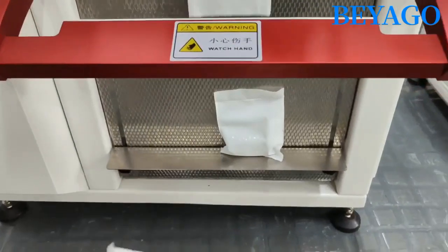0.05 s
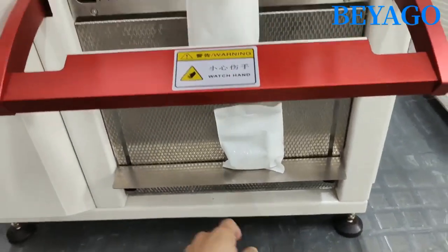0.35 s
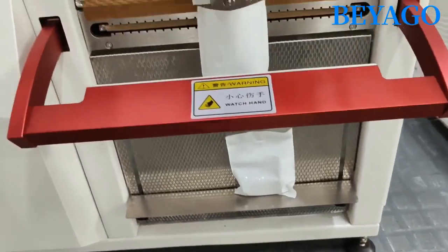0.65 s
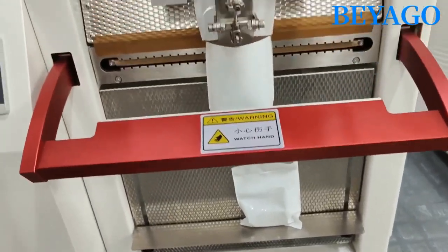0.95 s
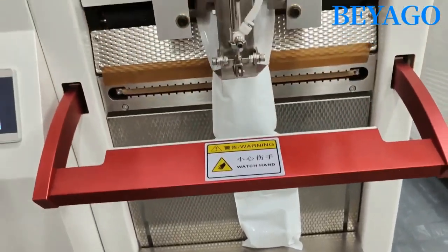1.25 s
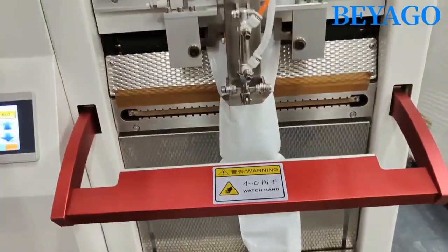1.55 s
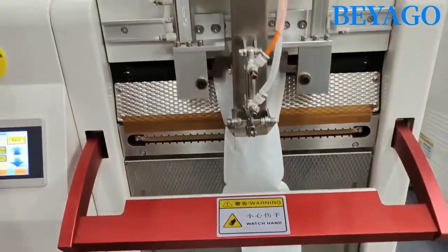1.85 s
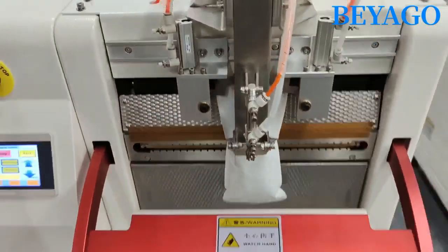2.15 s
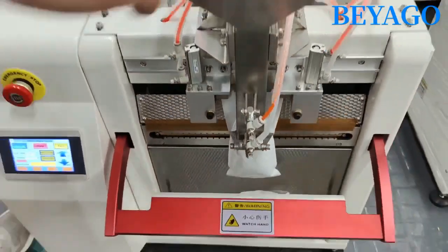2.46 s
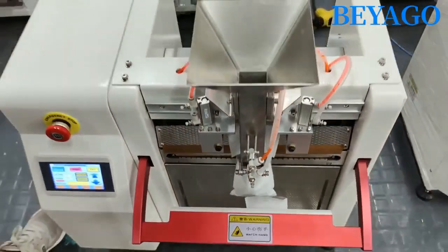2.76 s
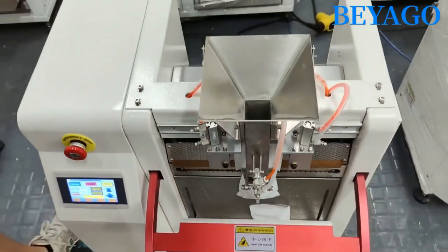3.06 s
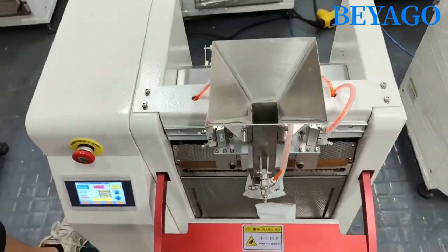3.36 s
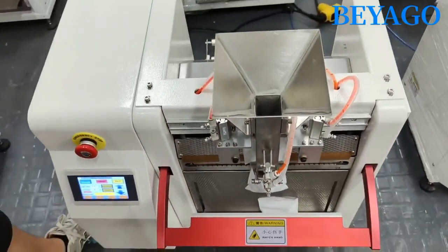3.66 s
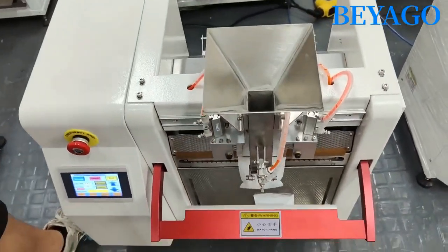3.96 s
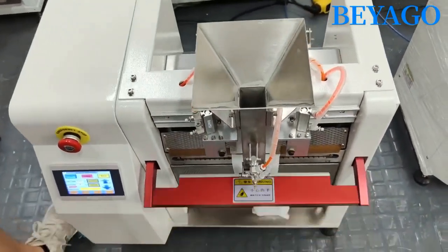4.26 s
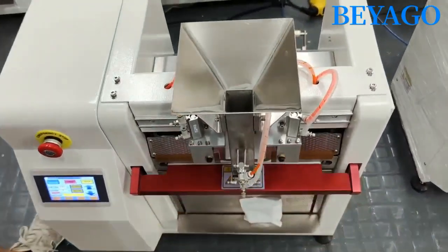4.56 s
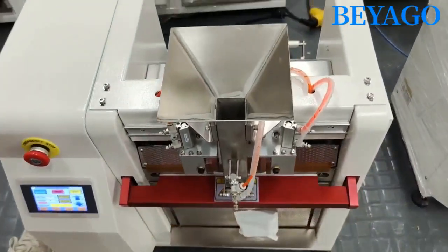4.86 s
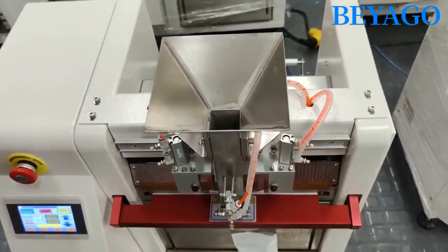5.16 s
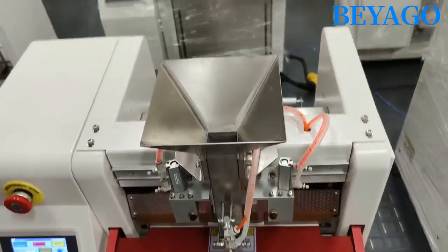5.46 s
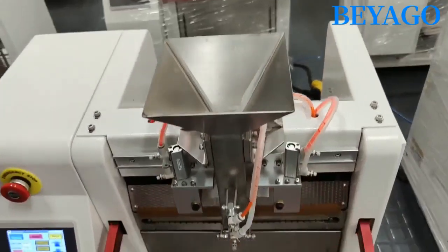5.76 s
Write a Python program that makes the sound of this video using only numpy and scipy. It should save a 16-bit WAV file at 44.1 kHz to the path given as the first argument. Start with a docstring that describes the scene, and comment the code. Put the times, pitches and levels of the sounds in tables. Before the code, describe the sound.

An automatic bagging machine hisses with air, clacks its clamps on steel, then rumbles and knocks as a sealing jaw snaps shut.

```python
"""An automatic bagging machine runs one cycle close by in a hard-walled workshop.
First a vacuum ejector hisses: turbulent jet noise, coloured by air-line resonances, as it holds the bag.
From 1.6 s pneumatic clamps clack on steel, ring in their bending modes and vent their air.
At 3.4 s the valve shuts, a cylinder slams into its stop and the hiss dies. Then the sealing jaw is
driven in with a rumble, knocks in the hollow frame and snaps shut near 5.5 s."""
import sys
import numpy as np
from scipy import signal
from scipy.fft import rfft, irfft, next_fast_len
from scipy.io import wavfile
from scipy.ndimage import map_coordinates

SR = 44100
rng = np.random.default_rng(int(sys.argv[2]) if len(sys.argv) > 2 else 0)


def file_out(sig):
    """Save sig as 16-bit WAV at sys.argv[1]."""
    # one column per channel
    cols = np.atleast_2d(sig).T
    # limit, then scale
    lim = np.clip(cols, -1, 1)
    pcm = np.round(lim * 32767).astype(np.int16)
    wavfile.write(sys.argv[1], SR, pcm)


N = 261072

# Spectra of distant machines, the jet and the jaw drive. Each row: frequency in Hz, level in dB.
WORKSHOP_SPECTRUM = [(25, -112), (80, -103), (150, -102), (400, -100), (1000, -87), (2500, -96),
                     (5000, -100), (9000, -100), (11500, -111), (15500, -107)]
JET_SPECTRUM = [(30, -116), (80, -104), (160, -100), (280, -91), (1000, -98), (1700, -81), (2500, -80.5),
                (4000, -76), (4850, -87), (5500, -80), (9800, -75.5), (11200, -99), (13000, -82.5),
                (15700, -82)]
RUMBLE_SPECTRUM = [(40, -104), (85, -79.5), (125, -70.5), (160, -70), (195, -63.5), (232, -66.5),
                   (272, -60), (325, -69), (430, -65), (620, -67.5), (900, -82.5), (2000, -85), (4900, -78),
                   (5600, -99), (9000, -104)]
# Reverberation of the workshop. Each row: frequency in Hz, t60 (time to fall 60 dB) in seconds.
ROOM_T60 = [(150, 3), (500, 0.93), (1200, 1.01), (3000, 1.25), (5000, 0.89), (9000, 0.69), (15000, 0.48)]
# Air-line resonances at four stages of the grip. Each row: frequency in Hz, width in Hz, level in dB.
CUPS_OPEN = [(334, 112, -66.5), (460, 80, -66.5), (600, 74, -59.5), (757, 120, -69), (1416, 310, -67.5),
             (1790, 440, -71.5), (2506, 260, -70.5), (3350, 95, -65.5), (3610, 290, -68.5),
             (4160, 100, -73), (5290, 70, -67), (5870, 94, -66), (6740, 220, -69.5), (8270, 110, -65),
             (9030, 290, -61.5), (10000, 560, -70.5), (15300, 880, -76)]
CUPS_SEALED = [(390, 120, -80), (699, 90, -67), (1357, 214, -69), (2060, 150, -71.5), (2750, 200, -82),
               (3470, 214, -62.5), (4170, 1040, -75), (5380, 150, -70), (5930, 220, -68), (6570, 110, -68),
               (6930, 190, -70), (8440, 680, -72), (9160, 280, -68), (10000, 130, -69), (16000, 310, -72)]
BAG_CLAMPED = [(984, 200, -69), (1450, 170, -69), (2010, 190, -66), (3400, 600, -68), (5520, 640, -71.5),
               (6940, 720, -71), (8830, 750, -68.5), (16300, 310, -82)]
BAG_SPREAD = [(357, 122, -63.5), (538, 26, -65.5), (684, 116, -65.5), (865, 73, -68.5), (1300, 220, -70),
              (1984, 270, -67), (3380, 310, -72), (5240, 200, -72.5), (6260, 660, -69.5),
              (6800, 320, -66.5), (8520, 360, -69.5), (9250, 370, -68.5), (10170, 160, -68.5),
              (15360, 500, -85.5)]
# Strokes of the drive. Each row: start and length in seconds, rumble in dB, boom in Hz, boom in dB.
STROKES = [(-.04, 0.3, -4.5, 560, -54), (0.757, 0.061, -5, 601, -48), (3.535, 0.18, -7.5, 182.5, -50),
           (4.155, 0.19, 3.5, 200, -42), (4.3, 0.18, -3, 267, -45.5), (5.122, 0.068, -23, 193.4, -46.5),
           (5.443, 0.2, -1, 567, -45.5), (5.795, 0.11, -10, 355, -44.5)]
# The casing's colour, common to crashes and puffs. Each row: frequency in Hz, gain in dB.
CASING_GAIN = [(30, -18), (80, -22), (125, -13), (200, -5), (330, 1), (600, -3.5), (1050, -2), (1600, -0.5),
               (2100, -2.5), (7500, -1), (9200, 7), (11200, -8), (15500, -5)]
# Frequencies in Hz at which each tone_db below is given.
TONE_HZ = [520, 1000, 2300, 4900, 9000]
# Peaks and hollows of clamp head and jaw frame. Each row: frequency in Hz, width in Hz, gain in dB.
HEAD_BODY = [(245, 59, -1), (400, 96, -5.5), (577, 66, 10), (1000, 56, 1.5), (1280, 27, -2),
             (1543, 496, -10.5), (1948, 100, 4.5), (2520, 670, 4.5), (4420, 540, -2)]
FRAME_BODY = [(271, 15, -1.5), (514, 170, -7.5), (740, 80, 3), (880, 280, -4.5), (1730, 210, -2.5),
              (1990, 110, -2.5), (3070, 1000, 2), (6800, 3900, -2)]
# Modes of clamp bars, panels and hollow frame. Each row: frequency in Hz, level in dB, t60 in seconds.
BAR_MODES = [(183, -1, 2.4), (265, -3, 1.2), (530, -10, 2), (597, -4.5, 2.2), (881, -4, 2.2),
             (958, -4, 1.0), (996, 5.5, 1.7), (1035, -2, 1.5), (1110, 1, .8), (1228, -3, 2), (1976, 2, 1.6),
             (2105, 0, 1.3), (2568, -4, 1.4), (2686, -4, 1.1), (3138, -2, .7), (3575, 2, .8), (3741, 2, .7),
             (4166, 5, .8), (4513, 1, .8), (4786, 3, .9), (4827, 0, .8), (5640, 4, .8), (6277, 0, .6),
             (8281, 8, .6), (9065, 0, .6)]
PANEL_MODES = [(200, -1.5, 2.4), (271.6, 8, 1.4), (310.6, 2.5, 1.8), (399, 3.4, 0.79), (466, 12, 0.76),
               (571, 8.5, 0.58), (747, 4, 1.1), (874, 3.5, 2), (1234, 8, 0.88), (1650, 8, 0.66),
               (2620, 8, 0.94), (1950, 14, 1.2)]
THUD_MODES = [(145, -14, 0.034), (242, -8.5, 0.054), (295, -8.5, 0.045), (481, -5.5, 0.037),
              (715, -9, 0.047), (1513, -22, 0.081)]
# Air let out of the cylinders. Each row: start in seconds, level in dB, tilt in dB per octave,
# port resonance in Hz, its height in dB, t60 in seconds.
PUFFS = [(2.245, -69, -2, 1490, 13, 1), (2.543, -72.5, -4, 1490, 17, 0.43),
         (3.424, -76.5, -8, 730, 9.5, 0.27), (3.55, -69, -2, 2380, -2.5, 1), (3.79, -84, -3, 1250, 14.5, 1),
         (4.16, -71, -1.5, 1160, 5.5, 0.5), (4.837, -94.5, 4, 3950, 14, 0.76),
         (5.157, -90.5, 8.5, 8850, -0.5, 0.96), (5.404, -83, 1, 8800, 10.5, 0.45),
         (5.485, -77, 2.5, 3260, -1, 1)]
# Clamps closing on steel. Each row: start in seconds, level in dB, tilt in dB per octave, ping in Hz,
# ring in dB, rebound delay in seconds, rebound gain in dB.
CLACKS = [(1.5985, -55, -0.4, 7000, -3.5, 0.017, -3), (1.7338, -52.5, -2, 1900, -10, 0.033, -8.5),
          (2.0657, -57, 1.5, 4800, -5.5, 0.031, -35), (2.19, -58.5, 0.7, 8900, -10, 0.018, 3)]
# Loose parts rattling. Each row: start in seconds, level in dB, tilt in dB per octave, ping in Hz,
# ping height in dB.
RATTLES = [(.779, -61.5, 2, 1450, 25), (0.817, -64.5, 3, 2970, 12), (0.838, -64, 1, 4000, 1),
           (0.862, -72.5, 2, 9100, 15), (1.772, -70, -4, 2120, 19), (2.017, -67, -3.5, 3720, 17.5),
           (2.046, -60, 0.8, 4100, 6), (2.095, -71, 1, 2120, 24), (2.146, -67, -1, 2070, 19.5),
           (3.569, -68.5, -4, 2530, 15.5), (4.152, -57.5, -1.5, 622, 30), (4.186, -59.5, -6, 568, 20),
           (4.582, -86, 1, 1590, 21), (4.992, -88, -6.5, 1630, 24), (5.337, -80.5, -8.5, 990, 19.5),
           (5.359, -83, -11, 920, 19), (5.407, -85, -1, 1830, 21)]
# Dull knocks in the frame. Each row: start in seconds, level in dB, tilt in dB per octave, ping in Hz,
# crash t60 in seconds, thud in dB.
KNOCKS = [(.772, -61.5, 1.5, 1420, 0.024, -37), (4.534, -68.5, 0.5, 460, 0.056, -25.5),
          (4.959, -70.5, 2, 594, 0.073, -29.5), (5.1622, -67.5, 2.5, 147, 0.062, -24),
          (5.458, -75.5, -1, 583, 0.037, -35), (5.807, -71.5, 3.5, 340, 0.022, -36)]
# Cylinders hitting their stops. Each row: start in seconds, level in dB, tilt in dB per octave,
# ping in Hz, crash t60 in seconds, ring in dB, thud in dB.
SLAMS = [(3.4667, -44, 4, 2000, 0.0096, -11, -25), (5.477, -53, -0.6, 2800, 0.067, -28, -35)]
# Small latches ticking. Each row: start in seconds, level in dB, tilt in dB per octave, ping in Hz,
# ping sharpness as frequency over width.
TICKS = [(3.421, -74, 7, 5440, 8), (3.783, -63, -2, 5900, 3.1), (5.343, -92, 8, 5900, 2.6),
         (5.445, -64, 1.5, 8000, 1.45), (5.786, -67, 0, 2580, 2)]
# Likeness of the two channels. Each row: frequency in Hz, coherence from 0 to 1.
COHERENCE = [(100, 0.97), (250, 0.91), (500, 0.77), (1000, 0.35), (2000, 0.15), (8000, 0.018)]
# Unequal colour of two microphone ports. Each row: frequency in Hz, left minus right in dB.
PORT_BALANCE = [(300, 0.8), (1300, 1.6), (2800, 4.5), (4000, 0), (5200, 0), (6700, -5.5), (7400, 1.5),
                (8050, 7), (9300, -7), (10900, 1), (12200, -1), (13700, -14), (15500, -3)]

# Kinds of event. A ping is a spectral peak (a hollow if negative); pan_db is left minus right.
CLACK = dict(tone_db=(-33, -0.5, -4, 1, -10), ping_db=9, sharpness=3, rise_s=0.000097,
             room_db=-15, pan_db=-3, grain_db=0.5)
REBOUND = dict(tone_db=(-17, 7, -1, 4.5, -0.5), ping_db=-18, sharpness=5.3, rise_s=0.0019,
               room_db=-11, ring_db=-14.5, pan_db=-1, grain_db=0)
RATTLE = dict(tone_db=(-19.5, -2, -3.5, 1, -11.5), sharpness=3.1, rise_s=0.0014,
              room_db=-13, ring_db=-18.5, pan_db=-2.5, grain_db=2.5)
KNOCK = dict(tone_db=(16, 8, -6.5, -15, -18), ping_db=8, sharpness=4, rise_s=0.00053,
             room_db=-10, ring_db=-20.5, pan_db=-2, grain_db=-1.5)
SLAM = dict(tone_db=(-14, 5, -1.5, -7.5, -15.5), ping_db=5, sharpness=4, rise_s=0.00023,
            room_db=-6, ring_top_hz=2200, pan_db=0.5, grain_db=4)
TICK = dict(tone_db=(-6, -18, 0, 1, -11.5), ping_db=15, rise_s=0.00025,
            room_db=-7.5, ring_db=-31, pan_db=-1, grain_db=2)
PUFF = dict(tone_db=(-1.5, 5.5, 6, -1, -8), sharpness=3.7, rise_s=0.006, pan_db=-1.2)
JAW_START_S = 4.1  # earlier events shake the clamp head, later ones the jaw's frame


def amp(db):
    """Amplitude ratio of a level in dB."""
    return 10 ** (np.asarray(db) / 20)


def along(points, hz):
    """Interpolation of (Hz, value) points on a logarithmic frequency axis."""
    f, v = np.transpose(points)
    return np.interp(np.log(hz + 1), np.log(f + 1), v)


def bumps(rows, hz):
    """Gain in dB of Lorentzian peaks and hollows."""
    return sum(db / (1 + (2 * (hz - centre) / width) ** 2) for centre, width, db in rows)


def curve(rows):
    """Linear interpolation of (seconds, value) points at every sample."""
    return np.interp(np.arange(N) / SR, *np.transpose(rows))


def since(s):
    """Seconds elapsed since time s; zero before it."""
    return np.maximum(np.arange(N) / SR - s, 0)


def fade(t, t60):
    """Exponential decay, 60 dB in t60 seconds."""
    return np.exp(-np.log(1000) * t / np.maximum(t60, 1e-3))


def white(count):
    """Two uncorrelated noises of 0 dB per Hz."""
    return rng.standard_normal((2, count)) * np.sqrt(SR / 2)


def wobble(rate):
    """A smooth random curve, rate knots a second."""
    knots = rng.standard_normal(int(N * rate / SR) + 4)
    return map_coordinates(knots, [np.arange(N) * rate / SR])


def pan(db):
    """Gains for a level difference, left minus right."""
    return amp([[db / 2], [-db / 2]])


def burst(t, kind, t60):
    """Noise under an exponential rise and decay, louder on one side."""
    attack = 1 - np.exp(-t / max(kind["rise_s"], 1e-4))
    return white(len(t)) * attack * fade(t, t60) * pan(kind["pan_db"])


def filtered(x, response):
    """Zero-phase filtering by a function of frequency."""
    size = next_fast_len(N + 8192)
    return irfft(rfft(x, size) * response(np.fft.rfftfreq(size, 1 / SR)), size)[..., :N]


def add(track, s, sound):
    """Superposition of a sound on the track at time s."""
    part = track[:, max(round(s * SR), 0):][:, :sound.shape[1]]
    part += sound[:, :part.shape[1]]


def workshop():
    """Distant machines sum incoherently to a steady wash."""
    return filtered(white(N), lambda hz: amp(along(WORKSHOP_SPECTRUM, hz)))


def room_tail(t, build_s=0.01):
    """Diffuse reverberation builds up, then decays, soonest in the top treble."""
    hz, times, spectra = signal.stft(white(len(t)), SR, nperseg=256)
    tail = signal.istft(spectra * fade(times, along(ROOM_T60, hz)[:, None]), SR)[1][:, :len(t)]
    return tail * (1 - np.exp(-(t / build_s) ** 2))


def jet(resonances, pan_db=-1.5):
    """Broadband jet noise and the air line's resonances add in power."""
    grid = np.linspace(0, SR / 2, 4096)
    peaks = sum(amp(db) ** 2 / (1 + ((grid - hz) / width * 2) ** 2 / 3) ** 3
                for hz, width, db in resonances)
    power = amp(along(JET_SPECTRUM, grid)) ** 2 + peaks
    return filtered(white(N), lambda hz: np.interp(hz, grid, np.sqrt(power))) * pan(pan_db)


def turbulence(hiss, depth_db=1.8):
    """Turbulence modulates the hiss in patches of about 600 Hz by 90 ms."""
    spectra = signal.stft(hiss, nperseg=512)[2]
    knots = np.indices(spectra.shape[1:]) / np.array([7, 16])[:, None, None]
    patches = rng.standard_normal([int(axis.max()) + 2 for axis in knots])
    gain = amp(depth_db * map_coordinates(patches, knots, order=1))
    return signal.istft(spectra * gain)[1][:, :N]


def panel_echoes(x, echo=0.21, drift_s=0.00009, count=5):
    """Reflections off nearby panels interfere as a comb filter, which slides as the listener moves."""
    n, out = np.arange(N), x.copy()
    for delay_s in np.linspace(.0015, .009, count) * rng.uniform(.8, 1.2, count):
        path_s = delay_s + drift_s * wobble(0.926)
        for ear, offset_s in enumerate(rng.normal(0, .0001, 2)):
            out[ear] += echo * np.interp(n - (path_s + offset_s) * SR, n, x[ear], left=0)
    return out / np.sqrt(1 + count * echo ** 2 / 2)


def ejector(jet_db=-2, spread_db=-3.5, flutter_db=0.74, shut_s=3.41, shut_db=-9.5, empty_db_per_s=65):
    """The line's resonances change as the bag is gripped, clamped and spread; shut off, it runs empty."""
    sealed = curve([(0.76, 0.046), (0.86, 1)])
    clamped = curve([(1.58, 0), (1.62, 0.98)])
    spread = curve([(2.235, 0.006), (2.33, 1)])
    stages = [(1 - sealed, CUPS_OPEN), (sealed * (1 - clamped), CUPS_SEALED),
              (clamped * (1 - spread), BAG_CLAMPED), (spread, BAG_SPREAD)]
    air = turbulence(sum(np.sqrt(share) * jet(resonances) for share, resonances in stages))
    shut = np.minimum(since(shut_s) / 0.12, 1)  # the valve takes 0.12 s to close
    drained_db = empty_db_per_s * since(shut_s + 0.11)  # the line bleeds briefly first
    strength_db = jet_db + spread_db * spread + shut_db * shut - drained_db
    return panel_echoes(air) * amp(strength_db + flutter_db * wobble(16))


def jaw_drive(idle_db=-25, spin_up_s=0.023, boom_rise_s=0.03, coast_db_per_s=66, lumpy_db=2):
    """Forced vibration: each stroke shakes the frame unevenly, sets a panel booming and coasts out."""
    effort, boom = np.full(N, amp(idle_db)), np.zeros(N)
    clock = np.cumsum(1 + 0.035 * wobble(45)) / SR  # the boom's pitch wanders
    swell = amp(lumpy_db * wobble(25))
    for s, length, db, boom_hz, boom_db in STROKES:
        coast = amp(-coast_db_per_s * since(s + length))
        effort = np.maximum(effort, np.minimum(since(s) / spin_up_s, 1) * amp(db) * coast)
        envelope = np.minimum(since(s) / boom_rise_s, 1) * amp(boom_db) * coast
        boom += envelope * np.sin(2 * np.pi * boom_hz * clock)
    rumble = filtered(white(N), lambda hz: amp(along(RUMBLE_SPECTRUM, hz)))
    return rumble * effort * amp(lumpy_db * wobble(30)) + swell * boom


def body_filter(x, kind, s, db, tilt_db, ping_hz, ripple_db=4.6, size=4096):
    """Source and filter: an event's tilted tone passes through the resonances of the part it shakes."""
    hz = np.fft.rfftfreq(size, 1 / SR)
    tone = list(zip(TONE_HZ, kind["tone_db"] + tilt_db * np.log2(TONE_HZ / np.median(TONE_HZ))))
    part = HEAD_BODY if s < JAW_START_S else FRAME_BODY
    ping = (ping_hz, ping_hz / kind["sharpness"], kind["ping_db"])
    gain_db = db + along(tone, hz) + along(CASING_GAIN, hz) + bumps([*part, ping], hz)
    # each point of contact favours its own set of the dense high modes
    ripple = map_coordinates(rng.standard_normal(size), [hz / 110]) * np.minimum(hz / 2500, 1)
    # folding the cepstrum makes the filter causal, of minimum phase
    cepstrum = irfft(np.log(amp(gain_db + ripple_db * ripple)))
    cepstrum[1:size // 2] *= 2
    cepstrum[size // 2 + 1:] = 0
    return signal.fftconvolve(x, irfft(np.exp(rfft(cepstrum)))[None], axes=1)


def exhausts(room_db=-14):
    """A cylinder's pressure decays exponentially as it vents through a resonant port."""
    out, t = np.zeros((2, N)), np.arange(SR) / SR
    for s, db, tilt_db, port_hz, port_db, t60 in PUFFS:
        air = burst(t, PUFF, t60) + amp(room_db) * room_tail(t)
        add(out, s, body_filter(air, dict(PUFF, ping_db=port_db), s, db, tilt_db, port_hz, ripple_db=2.6))
    return out


def thuds(favour_db=10.5, rise_s=0.0006, room_db=-4.5):
    """Impulse response of the hollow frame: damped low modes start in phase, favoured near the ping."""
    out, t = np.zeros((2, N)), np.arange(SR) / SR
    bass_cut = signal.butter(4, 115, "highpass", fs=SR, output="sos")  # the thuds carry no deep bass
    for s, _, _, ping_hz, *_, db in KNOCKS + SLAMS:
        favour = [(ping_hz, ping_hz / 2, favour_db)]
        modes = sum(amp(level + bumps(favour, hz)) * np.sin(2 * np.pi * hz * t) * fade(t, t60)
                    for hz, level, t60 in THUD_MODES)
        thud = signal.sosfilt(bass_cut, amp(db) * modes * (1 - np.exp(-t / rise_s)))
        tail = room_tail(t, build_s=0.031)
        reverb = signal.fftconvolve(thud[None], tail / np.linalg.norm(tail[0]), axes=1)[:, :SR]
        add(out, s, thud + amp(room_db) * reverb)
    return out


def ringing(modes, t, waver_hz=11):
    """Mode splitting: loose joints make each mode waver and give it two weaker neighbours."""
    hz, db, t60 = np.repeat(modes, 3, axis=0).T
    side = np.tile([-1, 0, 1], len(modes))
    split_hz = side * rng.uniform(.5, 1.3, len(hz)) * (5.5 + .002 * hz)
    waver = np.repeat(rng.standard_normal((len(hz), len(t) // 200 + 1)), 200, axis=1)[:, :len(t)]
    cycles = np.cumsum((hz + split_hz)[:, None] + waver_hz * waver, axis=1) / SR
    envelope = amp(db - 2 - 6 * abs(side))[:, None] * fade(t, t60[:, None]) * (1 - (t / t[-1]) ** 2)
    waves = envelope * np.exp(2j * np.pi * cycles)
    apart_cycles = np.minimum(hz / 6000, .5)  # the ears hear high modes out of step

    def strike(top_hz):
        """A blow excites the modes in random phase, weakly above top_hz."""
        phase = rng.random(len(hz)) + apart_cycles * rng.uniform(-1.04, 1, (2, len(hz)))
        weights = np.exp(2j * np.pi * phase) / (1 + (hz / top_hz) ** 4)
        return (weights @ waves).real
    return strike


def push(t, width_s=0.00007):
    """First contact sends one short pressure pulse to both ears together."""
    pulse = t * np.exp(-t / width_s)
    return pulse / pulse.sum() * SR


def chatter(t, depth_db, step_s=0.00223):
    """Amplitude modulation by loose parts that touch and part many times in one contact."""
    knots = t / step_s
    levels = rng.standard_normal(int(knots[-1]) + 2)
    return amp(depth_db * np.interp(knots, np.arange(len(levels)), levels))


def contacts(clack_t60=0.067, rattle_t60=0.068, tick_t60=0.016):
    """Every collision as (kind, start, level, tilt, ping, crash t60); each clamp rebounds once."""
    hits = []
    for s, db, tilt_db, ping_hz, ring_db, after_s, rebound_db in CLACKS:
        hits += [(dict(CLACK, ring_db=ring_db), s, db, tilt_db, ping_hz, clack_t60),
                 (REBOUND, s + after_s, db + rebound_db, tilt_db, ping_hz, clack_t60)]
    hits += [(dict(RATTLE, ping_db=ping_db), *row, rattle_t60) for *row, ping_db in RATTLES]
    hits += [(dict(SLAM, ring_db=ring_db), *row) for *row, ring_db, _ in SLAMS]
    hits += [(KNOCK, *row) for *row, _ in KNOCKS]
    hits += [(dict(TICK, sharpness=sharpness), *row, tick_t60) for *row, sharpness in TICKS]
    return hits


def impacts(bar_db=17, panel_db=25, push_db=-29, hard_rise_s=0.00026):
    """Impact on steel: a pulse, a short crash of dense modes, then free vibration and reverberation."""
    out, t = np.zeros((2, N)), np.arange(SR) / SR
    brief = t[:SR // 8]
    bars, panels = ringing(BAR_MODES, t), ringing(PANEL_MODES, t)
    pulse = amp(push_db) * push(brief)
    for kind, s, db, tilt_db, ping_hz, t60 in contacts():
        top_hz = kind.get("ring_top_hz", SR)  # a cushioned stop rings only the low modes
        ring = amp(bar_db) * bars(top_hz) if s < JAW_START_S else amp(panel_db) * panels(top_hz)
        hardness = 1 / (1 + (kind["rise_s"] / hard_rise_s) ** 2)  # a scrape has no clean pulse
        crash = burst(brief, kind, t60) * chatter(brief, kind["grain_db"])
        reverb = amp(kind["room_db"]) * t60 / 0.07 * room_tail(t)  # longer crashes feed the room more
        sound = reverb + amp(kind["ring_db"]) * ring
        add(sound, 0, hardness * pulse + crash)
        add(out, s, body_filter(sound, kind, s, db, tilt_db, ping_hz))
    return out


def scene():
    """Superposition of the moving parts and the ejector, slightly to the right, on the workshop's wash."""
    moving_parts = impacts() + thuds() + exhausts() + jaw_drive()
    return moving_parts * pan(-0.4) + ejector() + workshop()


def record(dry, top_hz=15950):
    """Two close, band-limited microphone ports are coherent in the bass and colour the treble unequally."""
    mid_side = np.array([dry[0] + dry[1], dry[0] - dry[1]]) / 2
    mid, side = filtered(mid_side, lambda hz: np.sqrt(1 + np.outer([1, -1], along(COHERENCE, hz))))
    ears = np.array([mid + side, mid - side])
    return filtered(ears, lambda hz: amp(np.outer([.5, -.5], along(PORT_BALANCE, hz))) * (hz < top_hz))


dry = scene()
out = record(dry)
file_out(out)
```